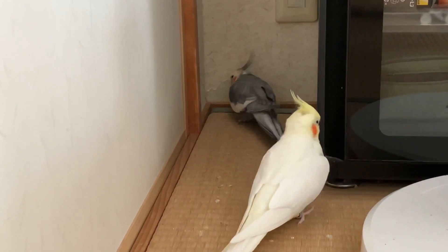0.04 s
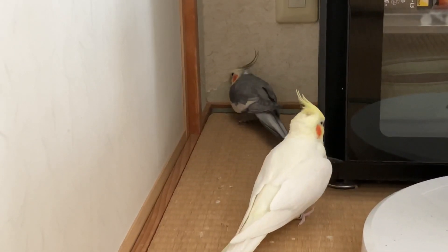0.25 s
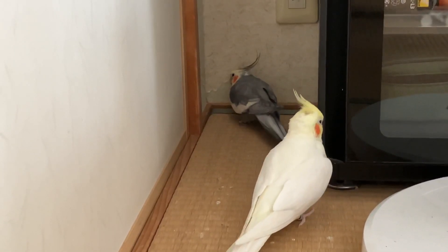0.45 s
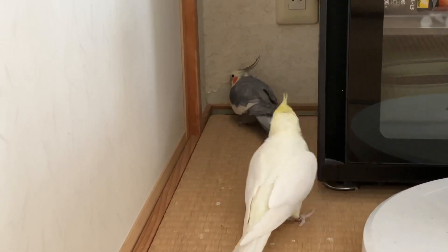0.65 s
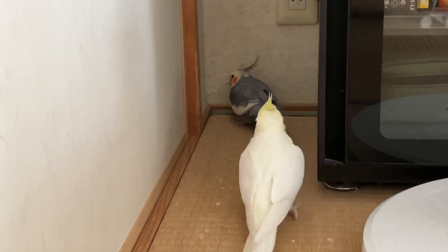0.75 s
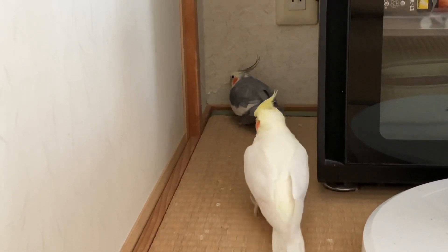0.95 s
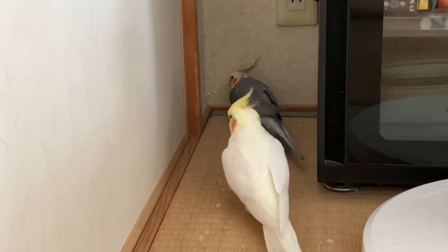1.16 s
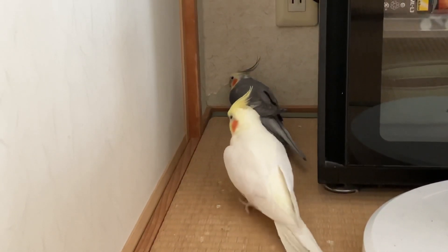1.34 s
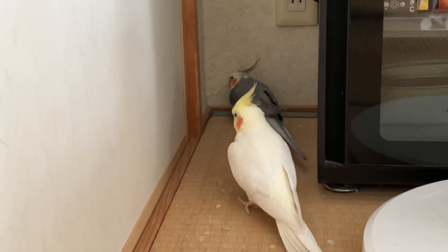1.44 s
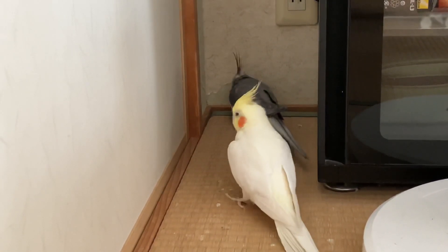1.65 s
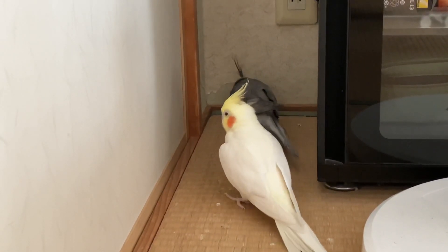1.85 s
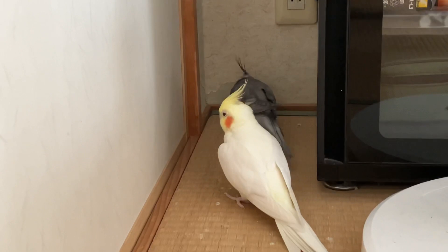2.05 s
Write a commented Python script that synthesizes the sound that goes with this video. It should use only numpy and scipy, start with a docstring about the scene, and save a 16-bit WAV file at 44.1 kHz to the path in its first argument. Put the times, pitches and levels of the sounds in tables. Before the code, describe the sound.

A cockatiel gives one harsh squawk from about 0.2 to 0.7 seconds, a rough, fluttering whistle with rasp and hiss, close and slightly left, with quick room echoes. Between 0.9 and 1.3 seconds, feet and beak tap faintly on a mat. Very soft feather brushes follow from about 1.1 to 2.1 seconds. A low, quiet room rumble with faint hiss runs underneath throughout.

```python
"""A cockatiel gives one harsh squawk from the floor in the corner of a quiet room.
Its voice is a rough whistle near 1.6 kHz, chopped by a fast flutter of the syrinx that makes the
pitch sag at every closure; air rasps and hisses with it, and the corner throws back quick echoes.
Afterwards feet and beak tap faintly on the mat and feathers brush, over a bed of low room rumble."""
import sys
import numpy as np
from scipy import signal
from scipy.fft import rfft, irfft
from scipy.io import wavfile

SR = 44100
rng = np.random.default_rng(int(sys.argv[2]) if len(sys.argv) > 2 else 0)


def master_out(mix):
    """Clip the mix to full scale and print it as 16-bit PCM to the path in sys.argv[1]."""
    frames = np.transpose(np.atleast_2d(mix))
    ceiling = np.clip(frames, -1, 1)
    pcm = np.round(ceiling * 32767).astype(np.int16)
    wavfile.write(sys.argv[1], SR, pcm)


N = 92610
TIME = np.arange(N) / SR

# colour of the room's rumble and of its faint hiss: f/Hz, relative level/dB
RUMBLE_COLOUR = [(20, -23.5), (38, -6.5), (64, 1), (123, -2), (156, 1.5), (166, -2), (179, -10), (201, -6),
                 (242, -11.5), (271, -19), (390, -23), (520, -48), (880, -120)]
AIR_COLOUR = [(180, -28), (300, -3.5), (425, -5.5), (565, -7.5), (737, -5), (1360, -17), (2140, -16.5),
              (4020, -25.5), (7950, -28.5), (9240, -36.5), (11300, -26), (13800, -42.5), (16000, -37.5)]
# fader ride on the rumble, one brief swell: t/s, gain/dB
RUMBLE_SWELL = [(1.2, -5.5), (1.4, -5.5), (1.62, -3), (1.7, 1), (1.78, -3.5), (1.95, -6)]
# stereo width of the room tone: f/Hz, side minus mid/dB
BED_WIDTH = [(30, -24.5), (170, -9), (400, -4.5), (1000, -1.5), (4000, 1.5), (12000, -1.5)]
# decay of the room's tail: f/Hz, t60/s
ROOM_T60 = [(300, 0.12), (1600, 0.33), (3300, 0.27), (5200, 0.23), (14000, 0.11)]
# swishes of feathers and feet: t/s, half-length/s, centre f/Hz, level/dB
BRUSHES = [(1.147, 0.028, 7200, -85.5), (1.392, 0.031, 4860, -83.5), (1.47, 0.075, 2540, -87),
           (1.63, 0.038, 2260, -83), (1.668, .016, 800, -76), (2.085, 0.033, 2370, -83.5)]
# taps of feet and beak: t/s, knock gain/dB, claw tick level/dB, f/Hz favoured by the struck spot
TAPS = [(0.8594, -41, -72, 400), (.94, -55, -73, 506), (1.048, -43.5, -60, 1056), (1.279, -57.5, -81, 960)]
# modes of the mat: f/Hz, relative level/dB, t60/s
MAT_MODES = [(400, -10, 0.04), (520, -10.5, 0.02), (788, -5.5, 0.028), (1264, -9, 0.015),
             (1640, -15, 0.039), (2020, -14.5, .012), (3100, -22.5, 0.0058)]
# flutter of the syrinx: t/s, closure rate/Hz
FLUTTER_RATE = [(0.2, 94.4), (0.26, 81.7), (0.3, 51.4), (0.41, 43.3), (0.46, 66.9), (0.59, 76.3),
                (0.61, 119.0), (0.66, 105.4)]
# faders of the squawk: t/s, then gain/dB of harmonics 1, 2 and 3, the low rasp and the treble
SQUAWK_FADERS = [(0.198, -47, -79, -95, -82, -68), (0.211, -50, -75, -90, -61, -65),
                 (0.22, -41.5, -55.5, -74, -48.5, -43.5), (0.245, -40, -54.5, -75, -42.5, -45),
                 (0.26, -42, -51.5, -69, -44.5, -49), (0.28, -39, -47, -55, -47, -49),
                 (0.301, -35, -42.5, -46, -49.5, -45), (0.34, -33, -37, -52, -51, -43.5),
                 (0.38, -40, -41, -67, -52, -53), (0.41, -35, -40, -46.5, -53.5, -42.5),
                 (0.424, -46, -45.5, -49, -57, -57.5), (.447, -53, -58, -57, -57, -49),
                 (0.464, -44, -50.5, -44.5, -61.5, -46.5), (0.5, -62, -56.5, -50.5, -58.5, -48.5),
                 (0.535, -48, -50.5, -47, -63.5, -44.5), (0.575, -48.5, -59, -46, -58, -48.5),
                 (0.61, -43.5, -50, -56, -60.5, -60), (0.635, -50, -55.5, -68, -71, -78),
                 (0.665, -72, -93, -93, -103, -106)]
# the whistle: t/s, f/Hz, sag/share of pitch, jitter/share of pitch, flutter depth/dB
WHISTLE = [(.203, 1626, 0.021, 0.013, 0), (.216, 1991, 0.012, 0.0079, 15.5),
           (.255, 2000, 0.0305, 0.013, 9.5), (.274, 1992, .45, 0.058, -6.5), (.294, 1625, 0.56, 0.018, 8),
           (.342, 1594, 0.38, 0.011, 9), (.368, 1746, 0.31, 0.017, 7), (.392, 1760, .35, 0.012, -4.5),
           (.428, 1504, .35, 0.03, -2), (.465, 1574, .1, 0.012, 16), (.555, 1554, 0.11, 0.012, 12),
           (.598, 1517, 0.2034, 0.033, 11), (.62, 1716, 0.16, 0.025, 8), (.66, 1680, .1, 0.016, -6)]
# the lower octave the voice starts on before it breaks: t/s, level/dB
UNDERTONE = [(.21, -64.5), (.218, -40.5), (.245, -51.5), (.27, -53), (.29, -95)]
# colour of the rasping air: f/Hz, relative level/dB
RASP_COLOUR = [(200, -34.5), (330, -19), (430, 8.5), (600, -5), (800, 9.5), (1050, -26), (1350, 20.5),
               (1900, -22), (2400, -35)]
# colour of the breath, before and after the beak changes shape: f/Hz, relative level/dB
BREATH_EARLY = [(1200, -12.5), (1900, -2), (2300, 5), (2750, 5.5), (3300, 1.5), (3700, -10), (4150, 7),
                (4800, -5.5), (5400, -10), (6500, -53)]
BREATH_LATE = [(1200, -19), (1900, -10), (2280, 6.5), (2580, -28), (3000, -6), (3700, -2), (4200, 3.5),
               (4650, 9.5), (5300, -41), (6500, -23)]
# treble resonances of the throat, before and after that change: f/Hz, relative level/dB
THROAT_EARLY = [(4600, -29), (5500, -6), (6400, -7.5), (7300, 3), (8100, -6.5), (8800, -18), (10700, -11),
                (11900, -0.5), (12800, -19.5), (13800, -23.5), (15000, -13.5), (16000, -47)]
THROAT_LATE = [(4600, -44), (5500, -1.5), (6300, 2.5), (6750, 4.5), (7400, -5), (8100, -1.5), (8800, -26),
               (9500, -13), (10200, 3), (11100, 3), (12100, -39), (13800, -37), (14800, -11), (16000, -45)]
# antiresonances of the throat: deepest at t/s, half-length/s, f/Hz, width/Hz
THROAT_NOTCHES = [(0.348, 0.074, 2280, 810), (.33, .05, 3620, 140), (0.483, 0.041, 5250, 1080)]

FLUTTER_START_S, JITTER_HZ = .2, 350


def from_db(db):
    """Decibels to gain."""
    return 10 ** (np.asarray(db) / 20)


def unit_rms(x):
    """Scale to unit rms."""
    return x / np.sqrt(np.mean(x ** 2) + 1e-20)


def automation(rows):
    """One curve in time per column, straight between the rows."""
    times, *columns = np.transpose(rows)
    return [np.interp(TIME, times, column) for column in columns]


def at_hz(points, hz):
    """Read a table on a log-frequency axis."""
    f, value = np.transpose(points)
    return np.interp(np.log(np.maximum(hz, 1)), np.log(f), value)


def equalise(x, colour):
    """Shape a signal with an EQ curve."""
    return irfft(rfft(x) * from_db(at_hz(colour, np.fft.rfftfreq(N, 1 / SR))), N)


def noise(colour):
    """Coloured noise of unit rms."""
    return unit_rms(equalise(rng.standard_normal(N), colour))


def wander(hz):
    """Random drift of unit rms, up to a given rate."""
    return unit_rms(signal.sosfilt(signal.butter(4, hz, fs=SR, output="sos"), rng.standard_normal(N)))


def pan(left_db):
    """Stereo gains that favour the left by a level difference."""
    return from_db(np.array([[left_db], [-left_db]]) / 2)


def room_tone(rumble_db=-55.5, air_db=-74.5):
    """The bed: low rumble and faint hiss, wider towards the treble."""
    bed = 0
    for colour, db in ((RUMBLE_COLOUR, rumble_db + automation(RUMBLE_SWELL)[0]), (AIR_COLOUR, air_db)):
        mid = noise(colour)
        side = equalise(noise(colour), BED_WIDTH) * np.array([[1], [-1]])
        bed = bed + from_db(db) * (mid + side)
    return bed


def room_reverb(x, corner_db=-6, corner_t60_s=.025, tail_db=-6.5, predelay_s=.0066):
    """Direct sound, the corner's quick echoes and a tail that rings longest in the mids."""
    t = TIME[:N // 2]
    tail = 0
    edges_hz = np.geomspace(100, 18000, 9)
    for low, high in zip(edges_hz, edges_hz[1:]):
        bandpass = signal.butter(2, [low, high], "band", fs=SR, output="sos")
        band = signal.sosfilt(bandpass, rng.standard_normal((2, len(t))))
        t60 = at_hz(ROOM_T60, np.sqrt(low * high))
        tail = tail + band * 1e-3 ** (t / t60) * (t > predelay_s)
    corner_decay = 1e-3 ** (t / corner_t60_s) * (t > .0003)
    corner = rng.standard_normal(len(t)) * np.array([[1], [-1]]) * corner_decay
    echoes = from_db(corner_db) * unit_rms(corner) + from_db(tail_db) * unit_rms(tail)
    response = (t == 0) + echoes / np.sqrt(len(t))
    return signal.fftconvolve(x[None], response, axes=1)[:, :N]


def brushes(skirt_oct=.32):
    """Feathers and feet brush in soft, narrow-band swishes as the bird shuffles."""
    swishes, skirt = 0, 2 ** skirt_oct
    for s, half_length, hz, db in BRUSHES:
        colour = [(hz / 4, -50), (hz / skirt, -16), (hz, 0), (hz * skirt, -16), (hz * 4, -50)]
        swell = np.exp(-.5 * ((TIME - s) / half_length) ** 2)
        swishes = swishes + from_db(db) * swell * noise(colour)
    return swishes


def taps(touch_share=.41, settle_s=.00254, tick_decay_s=.0028, spot_db=6, spot_width_oct=.33):
    """A claw ticks, then the weight lands and the mat knocks, coloured by the spot that is struck."""
    hits = 0
    for s, knock_db, tick_db, spot_hz in TAPS:
        push = np.zeros(N)
        push[int(s * SR)] = touch_share
        push[int((s + settle_s) * SR)] = -1
        for k, (hz, db, t60) in enumerate(MAT_MODES):
            boost_db = spot_db * np.exp(-(np.log2(hz / spot_hz) / spot_width_oct) ** 2)
            hits = hits + (-1) ** k * from_db(knock_db + db + boost_db) * mat_mode(push, hz, t60)
        tick_envelope = (TIME > s) * np.exp(-np.abs(TIME - s) / tick_decay_s)
        hits = hits + from_db(tick_db) * tick_envelope * rng.standard_normal(N)
    return hits


def mat_mode(push, hz, t60):
    """One mode of the mat rings and dies away after a push."""
    r, w = from_db(-60 / (t60 * SR)), 2 * np.pi * hz / SR
    return signal.lfilter([0, np.sin(w)], [1, -2 * r * np.cos(w), r * r], push + 1e-18)


def flutter_cycles():
    """Running count of the syrinx's closures."""
    return np.cumsum(automation(FLUTTER_RATE)[0] * (TIME > FLUTTER_START_S)) / SR


def flutter(depth_db, lag_cycles=0):
    """Tremolo of the opening and closing syrinx, with a mean power of one."""
    swing = .5 * np.cos(2 * np.pi * (flutter_cycles() - lag_cycles))
    return from_db(depth_db * swing) / np.sqrt(np.i0(depth_db * np.log(10) / 20))


def rasp(depth_db, lag_cycles=.45, top_hz=1496, end_hz=433.8, jitter=.061, air_db=.5):
    """Grit as the syrinx closes: rasping air and a rough downward flick, no two flicks alike."""
    closure, age = np.divmod(flutter_cycles() - lag_cycles + .5, 1)
    scatter = rng.uniform(-1, 1, (N, 2)) * [3, .2]
    scatter_db, scatter_oct = scatter[closure.astype(int)].T
    dive_hz = top_hz * (end_hz / top_hz) ** age * 2 ** scatter_oct
    hz = dive_hz * (1 + jitter * wander(JITTER_HZ))
    flick = from_db(scatter_db) * np.sin(np.pi * age) * np.sin(2 * np.pi * np.cumsum(hz) / SR)
    air = from_db(air_db) * noise(RASP_COLOUR)
    return flutter(depth_db, lag_cycles) * (np.sqrt(2) * flick + air)


def treble(hz, phase, depth_db, sounding, beak_shift_s=.418, morph_s=.035):
    """The bright edge: harmonics 4 to 9, hiss and breath, all morphing as the beak changes shape."""
    late = np.clip(.5 + (TIME - beak_shift_s) / morph_s, 0, 1)
    overtones = 0
    for k in range(4, 10):
        # the early resonances bite hard, then ease as the late ones join them
        throat_db = (2.5 - late) * at_hz(THROAT_EARLY, k * hz) + late * at_hz(THROAT_LATE, k * hz)
        overtones = overtones + from_db(throat_db) * np.sin(k * phase)
    overtones = overtones / np.std(overtones[sounding])
    hiss = np.sqrt(1 - late) * noise(THROAT_EARLY) + np.sqrt(late) * noise(THROAT_LATE)
    breath = np.sqrt(1 - late) * noise(BREATH_EARLY) + np.sqrt(late) * noise(BREATH_LATE)
    air = flutter(.048 * depth_db) * (from_db(-6) * hiss + from_db(-4) * breath)  # barely pulses
    return from_db(-1.5) * flutter(depth_db) * overtones + air


def pitch_sag(sag, jitter, lag_cycles=.6, steepness=4.2, scoop=.15, sag_jitter=.09):
    """Pitch ratio that plunges and turns unsteady as the syrinx closes, and scoops up as it opens."""
    age = (flutter_cycles() - lag_cycles) % 1
    droop = sag * (age ** steepness + scoop * (1 - age) ** steepness)
    wobble = (jitter + sag_jitter * droop) * wander(JITTER_HZ)
    return np.maximum(1 - droop + wobble, .1)


def whistle(phase, bend, harmonics_db, undertone_db, shimmer_db=2, sag_loss=.6, sag_dulling=2.8):
    """The core tone: shimmering harmonics that weaken and dull as they sag, and a brief lower octave."""
    tone = from_db(undertone_db) * np.sin(phase / 2)
    for k, db in enumerate(harmonics_db, 1):
        gain = from_db(db + shimmer_db * wander(JITTER_HZ))
        fade = np.minimum(bend, 1) ** (sag_loss + sag_dulling * (k - 1))
        tone = tone + gain * fade * np.sin(k * phase)
    return np.sqrt(2) * tone


def throat(x):
    """Antiresonances open and close, carving dark valleys between the harmonics."""
    for s, half_length, hz, width_hz in THROAT_NOTCHES:
        notched = signal.filtfilt(*signal.iirnotch(hz, hz / width_hz, fs=SR), x)
        wet = np.exp(-((TIME - s) / half_length) ** 4)
        x = x + wet * (notched - x)
    return x


def squawk(attack_s=.008, rasp_trim_db=-1.5):
    """The fluttering syrinx drives whistle, treble and rasp together, out through the throat."""
    *harmonics_db, rasp_db, treble_db = automation(SQUAWK_FADERS)
    pitch_hz, sag, jitter, depth_db = automation(WHISTLE)
    undertone_db = automation(UNDERTONE)[0]
    start_s, end_s = SQUAWK_FADERS[0][0], SQUAWK_FADERS[-1][0]
    sounding = (TIME > start_s) & (TIME < end_s)
    bend = pitch_sag(sag, jitter)
    hz = pitch_hz * bend
    phase = 2 * np.pi * np.cumsum(hz) / SR
    core = flutter(depth_db) * whistle(phase, bend, harmonics_db, undertone_db)
    edge = from_db(treble_db) * treble(hz, phase, depth_db, sounding)
    duck = 1 - from_db(np.minimum(undertone_db - rasp_db, -4))  # holds the rasp until the voice breaks
    grit = from_db(rasp_db + rasp_trim_db) * duck * rasp(depth_db)
    attack = np.clip((TIME - start_s) / attack_s, 0, 1)
    return throat(attack * sounding * (core + edge + grit))


def scene():
    """The squawk up front, small movements after it and room tone beneath, all a little to the left."""
    left, right = room_reverb(squawk()) * pan(left_db=2)
    bird = np.array([np.roll(left, 1), right])  # reaches the right microphone one sample earlier
    movements = room_reverb(taps() + brushes()) * pan(left_db=2.5)
    return bird + movements + room_tone() * pan(left_db=2.4)


def record(dry, dip_hz=9050, dip_q=6.3, stopband_hz=16500):
    """A narrow treble band near 9 kHz is cut out; a steep low-pass takes off the very top."""
    dipped = signal.lfilter(*signal.iirnotch(dip_hz, dip_q, fs=SR), dry)
    return signal.sosfilt(signal.cheby2(12, 70, stopband_hz, fs=SR, output="sos"), dipped)


dry = scene()
out = record(dry)
master_out(out)
```